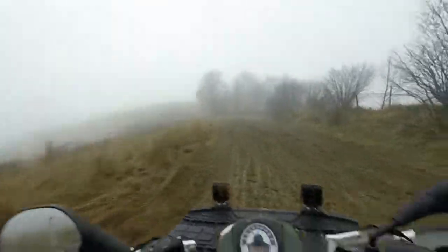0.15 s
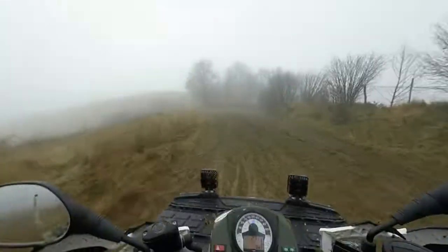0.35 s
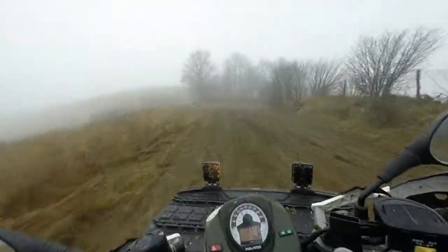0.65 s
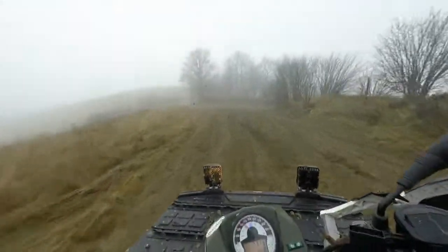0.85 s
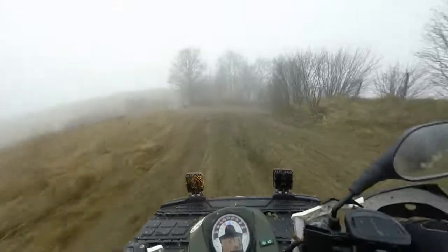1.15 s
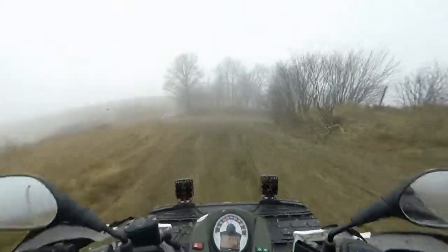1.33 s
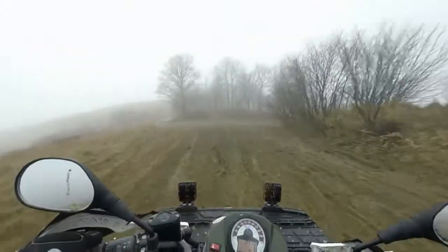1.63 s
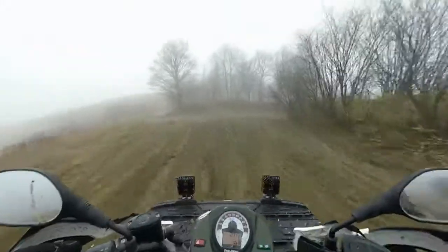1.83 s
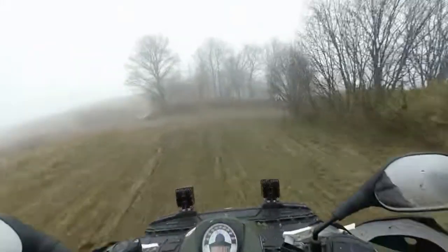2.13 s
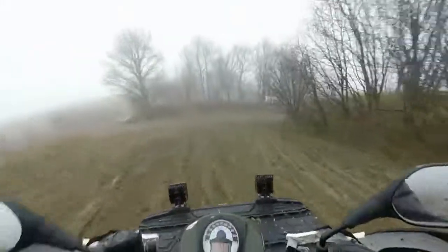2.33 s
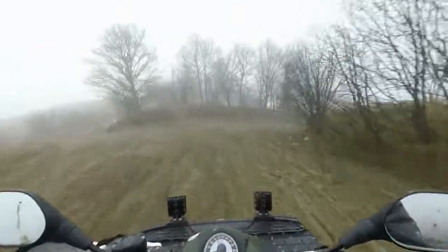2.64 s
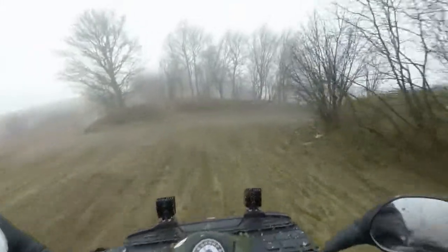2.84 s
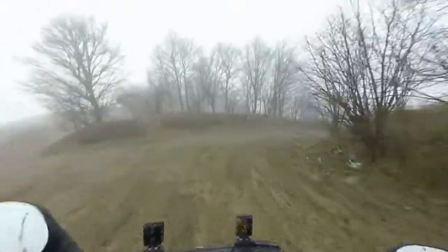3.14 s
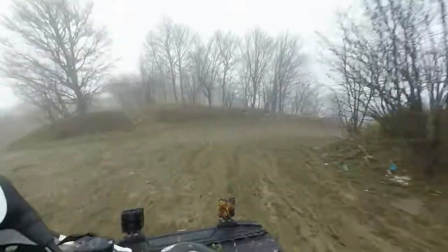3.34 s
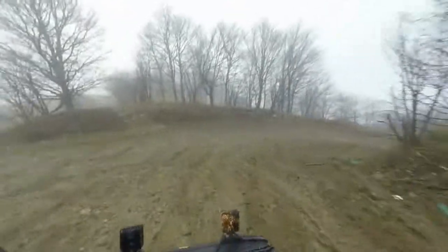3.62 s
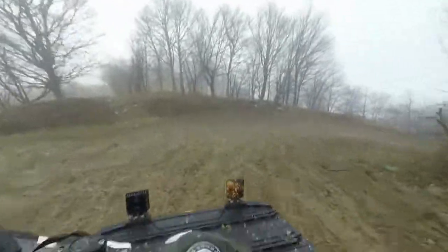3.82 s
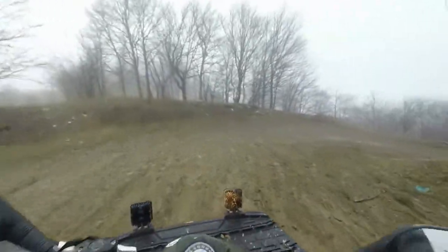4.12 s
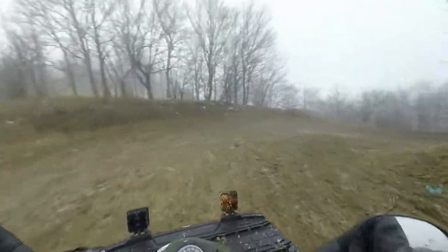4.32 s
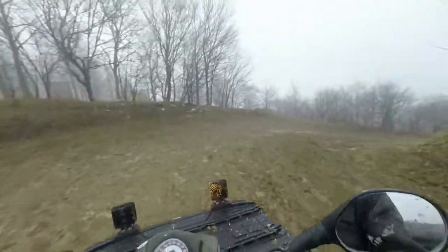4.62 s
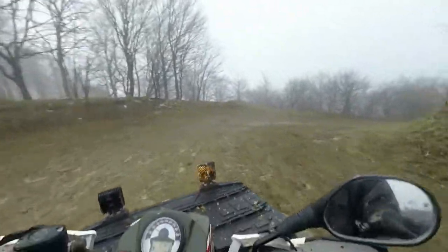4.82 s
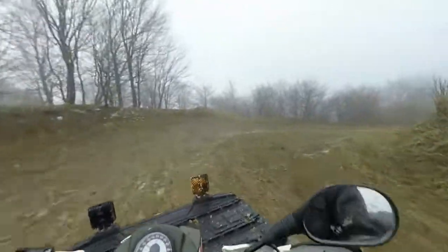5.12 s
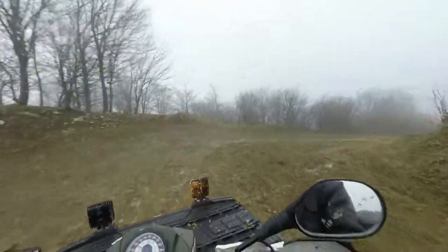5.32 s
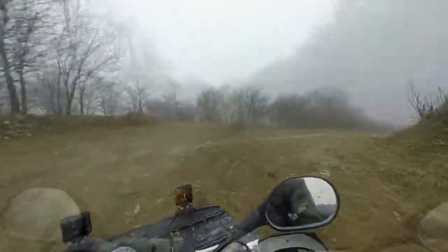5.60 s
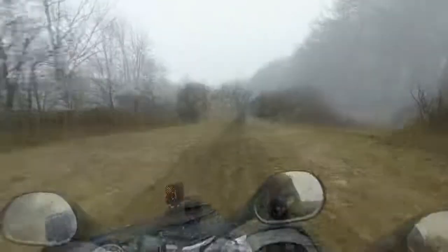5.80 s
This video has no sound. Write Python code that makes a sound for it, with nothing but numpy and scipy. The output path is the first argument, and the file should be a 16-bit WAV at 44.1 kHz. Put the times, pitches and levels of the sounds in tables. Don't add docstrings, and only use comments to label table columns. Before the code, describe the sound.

Heard from a microphone in a closed housing on the rider, a quad bike engine blares at full throttle for just over a second, raspy and clattering. It eases off, sinking to a low slow chug while ruts thump the frame, a brake squeaks briefly and loose plastic knocks. After four seconds the engine picks up again, much quieter than at first. Outdoors on a muddy track.

```python
import sys
import numpy as np
from scipy import signal
from scipy.fft import rfft, irfft
from scipy.io import wavfile

SR = 44100
rng = np.random.default_rng(int(sys.argv[2]) if len(sys.argv) > 2 else 0)


def materialize(psi):
    bounded = np.clip(np.atleast_2d(psi).T, -1, 1)
    quanta = np.round(bounded * 32767).astype(np.int16)
    wavfile.write(sys.argv[1], SR, quanta)


def rack_gain(trim_db):
    fader = np.asarray(trim_db, float)
    return 10 ** (fader / 20)


N = 262836

# [f/Hz, width/Hz, level/dB]
HOUSING = [(1440, 51, -2), (1696, 88, 5.5), (2050, 51, 2.5), (2390, 68, 3), (2501, 60, 7), (2615, 64, 4.5),
           (2740, 135, 6), (2667, 500, 5), (2900, 73, 5.5), (3200, 72, 1), (3740, 220, -0.5), (3730, 66, 7),
           (4313, 560, 11), (4955, 127, -12.5), (5597, 440, 8.5), (7020, 1160, 2.5), (8270, 370, -6),
           (9520, 1200, 5), (14300, 500, 2)]


def rms_one(x):
    return x / np.sqrt(np.mean(x ** 2) + 1e-20)


def in_time(rows):
    s, *columns = np.transpose(rows)
    return [np.interp(np.arange(N) / SR, s, column) for column in columns]


def at_hz(points, hz):
    points = np.array(points)
    return np.interp(np.log(hz), np.log(points[:, 0]), points[:, 1])


def drift(rate):
    step = 40
    r = np.exp(-2 * np.pi * rate * step / SR)
    slow = signal.lfilter([1], [1, -2 * r, r * r], rng.standard_normal(N // step + 2002))[2000:]
    return np.interp(np.arange(N) / step, np.arange(len(slow)), rms_one(slow))


def colour(x, spectrum, bumps=()):
    size = 2 ** 19
    hz = np.arange(1, size // 2 + 2) * SR / size
    db = at_hz(spectrum, hz)
    db = db - 30 * np.clip(np.log2(spectrum[0][0] / hz), 0, 3)
    db = db - 30 * np.clip(np.log2(hz / spectrum[-1][0]), 0, 3)
    for centre_hz, width, bump_db in bumps:
        db = db + bump_db / (1 + (2 * (hz - centre_hz) / width) ** 2)
    cepstrum = irfft(np.log(rack_gain(db)), size)
    cepstrum[1:size // 2] *= 2
    cepstrum[size // 2 + 1:] = 0
    return irfft(rfft(x, size) * np.exp(rfft(cepstrum)), size)[..., :N]


def ring(clicks, hz, t60):
    r, w = rack_gain(-60 / (t60 * SR)), 2 * np.pi * hz / SR
    return signal.lfilter([0, np.sin(w)], [1, -2 * r * np.cos(w), r * r], clicks + 1e-18)


def swell(start, end, db, rise, fall, floor_db):
    t = np.arange(0, N, 20)[:, None] / SR
    before, after = np.clip(start - t, 0, None), np.clip(t - end, 0, None)
    level = np.max(db - rise * before - fall * after, axis=1)
    return np.interp(np.arange(N) / SR, t[:, 0], np.maximum(level, floor_db))


def exhaust(cycle_hz, cycles, upper_db, roar_db, drone_db):
    # [multiple of the cycle, level at full speed/dB, level at low speed/dB]
    order_levels = [(5, -5, -10), (6, 0, -7), (7, -15, -2), (8, -10, -8), (9, -10, -7), (10, -13, -6),
                    (12, -12, -16), (11, -15, -10), (14, -16, -19), (16, -12, -22), (18, -19, -30),
                    (13, -15, -20), (15, -16, -21), (19, -15, -30), (20, -15, -30), (21, -16, -30),
                    (23, -16, -30)]
    # [f/Hz, level per Hz/dB]
    roar_spectrum = [(26, -25.5), (45, -0.5), (103, -6.5), (156, -10.5), (221, -7), (307, -16.5),
                     (400, -25.5), (520, -34.5), (880, -120)]
    # [f/Hz, level per Hz/dB]
    drone_spectrum = [(180, -22), (300, -5.5), (333, -9.5), (698, -11), (784, -11.5), (875, -15.5),
                      (963, -11.5), (1300, -14.5), (1400, -6.5), (1820, -20.5), (3080, -120)]
    # [f/Hz, width/Hz, level/dB]
    panel_bumps = [(190, 240, 0.5), (476, 41, 5), (688, 12, -4)]
    low_speed_hz, full_speed_hz = 40, 48
    fast = np.clip((cycle_hz - low_speed_hz) / (full_speed_hz - low_speed_hz), 0, 1)

    def order(k, db):
        level = rack_gain(db + (2 - fast) * drift(12))
        turns = k * cycles + .25 * rng.random() + (.045 - .03 * fast) * drift(8)
        return level * np.sqrt(2) * np.sin(2 * np.pi * turns)

    tones = sum(order(k, boom(k)) for k in (2, 3, 4))
    for k, full_db, slow_db in order_levels:
        usual_db = upper_db + fast * full_db + (1 - fast) * slow_db
        tones = tones + order(k, np.maximum(boom(k), usual_db))
    puff = (1 + 0.053 * np.cos(2 * np.pi * cycles)) * rack_gain(1.2 * drift(6.5))
    roar = rms_one(colour(puff * rng.standard_normal(N), roar_spectrum, panel_bumps))
    drone = rms_one(colour(puff * rng.standard_normal(N), drone_spectrum, panel_bumps))
    turn_loss_db = 2.5 * np.clip((np.arange(N) / SR - 3.3) / 1.3, 0, 1)
    return tones + rack_gain(roar_db - 3.0 - turn_loss_db) * roar + rack_gain(drone_db - 1.47) * drone


def boom(k):
    SECOND, THIRD, FOURTH, FIFTH, SIXTH, SEVENTH, EIGHTH, NINTH, TENTH, ELEVENTH = range(2, 12)
    # [start t/s, end t/s, multiple of the cycle, level/dB]
    pipe_booms = [(0, 1.29, SECOND, -33.5), (1.1, 1.32, SIXTH, -38), (.8, 1.28, THIRD, -44),
                  (.38, 1.25, FOURTH, -40), (0, .3, FIFTH, -42), (.05, .3, FOURTH, -43),
                  (2.3, 2.5, THIRD, -40), (.75, 1.28, FIFTH, -40), (1.36, 1.62, THIRD, -35),
                  (1.62, 1.97, THIRD, -34), (1.32, 1.5, FOURTH, -44), (1.95, 2.2, SECOND, -42),
                  (2.0, 2.25, THIRD, -43), (2.1, 2.27, SEVENTH, -43), (2.02, 2.5, TENTH, -49),
                  (2.56, 3.04, FOURTH, -38), (2.38, 2.56, FOURTH, -43), (1.8, 1.95, NINTH, -46),
                  (2.72, 2.95, NINTH, -46), (2.55, 2.9, ELEVENTH, -51), (2.3, 2.6, EIGHTH, -48),
                  (1.85, 2.15, FIFTH, -44), (4.28, 4.45, NINTH, -47), (3.02, 3.35, FIFTH, -43),
                  (3.55, 4.1, SIXTH, -51), (4.26, 4.42, FIFTH, -46), (4.45, 4.58, SEVENTH, -45),
                  (4.6, 4.87, THIRD, -42), (4.6, 4.86, FOURTH, -43), (4.3, 4.85, EIGHTH, -48),
                  (5.02, 5.38, SEVENTH, -43.5), (4.4, 4.62, TENTH, -50), (5.1, 5.5, ELEVENTH, -55),
                  (4.9, 5.35, TENTH, -50), (5.3, 5.45, SECOND, -45), (5.05, 5.35, THIRD, -46),
                  (5.47, 5.75, FOURTH, -45), (5.5, 5.62, EIGHTH, -45), (5.6, 5.8, THIRD, -48)]
    floor_db, fade = -58, 220
    rows = [(start, end, db) for start, end, order, db in pipe_booms if order == k]
    start, end, db = np.transpose(rows + [(0, 0, floor_db)])
    return swell(start, end, db, fade, fade, floor_db - 10 * (k > 4))


def clatter(cycles, repeat_share, level_db, bright_db, lower_db):
    # [f/Hz, level per Hz/dB]
    clatter_spectrum = [(900, -27), (1300, -23), (2000, -9), (3000, -17), (4000, -24.5), (6000, -26),
                        (8000, -35.5), (11000, -42.5), (15000, -49)]
    # [f/Hz, width/Hz, share added]
    turned_bumps = [(2010, 150, 0.28), (2480, 220, 0.23), (2840, 300, -0.21), (4150, 320, 0.35),
                    (1700, 360, -0.16), (5000, 240, 0.22)]
    count = 320
    slot = np.floor(cycles * count).astype(int)
    pattern = rng.standard_normal(count) * rack_gain(3.5 * rng.standard_normal(count))
    pattern = 0.79 * np.roll(pattern, count // 2) + pattern
    pattern = pattern - pattern.mean()
    repeated = rms_one(np.diff(slot, prepend=slot[0]) * pattern[slot % count])
    loose = rms_one(rng.standard_normal(N) * rack_gain(0.24 * drift(460.0)))
    hits = np.sqrt(repeat_share) * repeated + np.sqrt(1 - repeat_share) * loose
    hits *= rack_gain(0.43 * drift(15.0))
    crank = np.cos(2 * np.pi * cycles)
    hits *= 1 + .5 * crank ** 12 + .08 * crank

    turn_s, turn_takes_s, cover_gain_db, case_loss_db = 4.17, 0.31, 2, 1
    turned = np.clip((np.arange(N) / SR - turn_s) / turn_takes_s, 0, 1)
    rest = rms_one(colour(hits, clatter_spectrum, HOUSING))
    added = sum(share * signal.lfilter(*signal.iirpeak(hz, hz / width, SR), rest)
                for hz, width, share in turned_bumps)
    rest = rest + turned * added

    out = 0
    for edge_hz in (1550, 2250, 3450, 4950, 6500, 8300, 11500, 20000):
        band = signal.sosfiltfilt(signal.butter(2, edge_hz, fs=SR, output="sos"), rest)
        rest = rest - band
        balance_db = bright_db * (edge_hz > 4000)
        balance_db = balance_db + (lower_db + 4.5 - case_loss_db * turned) * (edge_hz < 3000)
        balance_db = balance_db + cover_gain_db * turned * (edge_hz == 4950)
        out = out + band * rack_gain(balance_db + .4 * drift(4) + 1.0 * drift(14) + 1.1 * drift(80))
    return rack_gain(level_db) * out


def flares():
    # [t/s, peak level/dB]
    snaps = [(0.0458, -6), (0.0872, -5), (0.139, -11), (0.2389, -12), (0.2713, -17), (0.4224, -22),
             (0.7236, -8), (0.8046, -21), (0.9448, -20), (1.0251, -10), (1.1024, -6), (1.224, -17),
             (1.245, -3.5), (1.8297, -24), (1.8956, -30), (1.9814, -19), (2.0118, -21), (2.0901, -23),
             (2.143, -22), (2.1799, -16), (2.2373, -22), (2.5765, -29), (2.6748, -25), (3.0859, -26),
             (3.2789, -25), (4.4076, -18), (4.4523, -25), (4.4822, -20), (4.8379, -23), (4.8728, -27),
             (4.917, -18), (5.0045, -33), (5.0355, -28), (5.0988, -17.5), (5.2225, -32), (5.4575, -28)]
    # [f/Hz, level per Hz/dB]
    flare_spectrum = [(1900, -2.5), (2500, 1), (3300, -8), (4300, -15), (6000, -26)]
    s, peak_db = np.transpose(snaps)
    kicks = np.zeros(N)
    kicks[(s * SR).astype(int)] = rack_gain(peak_db - 13)
    r = np.exp(-1 / (0.0083 * SR))
    noise = rms_one(colour(rng.standard_normal(N), flare_spectrum, HOUSING))
    soft_kicks = signal.lfilter([.02], [1, -.98], kicks + 1e-18)
    return noise * signal.lfilter([1], [1, -r], soft_kicks)


def whine():
    # [middle t/s, length/s, f/Hz, level/dB]
    gear_tones = [(.5, .4, 1870, -37), (1.05, .3, 1680, -41), (.5, .2, 1390, -44), (1.82, .07, 1385, -38),
                  (1.93, .05, 1390, -41), (2.11, .05, 1385, -41), (1.55, .1, 1400, -44),
                  (1.0, .25, 2750, -31), (.62, .2, 2745, -33), (.9, .18, 2955, -35), (.75, .12, 2855, -33),
                  (1.27, .06, 2600, -30), (1.24, .08, 2500, -33), (1.85, .35, 2020, -44),
                  (2.33, .1, 2030, -37), (2.62, .08, 1600, -43), (2.5, 1.1, 155, -44), (2.1, .25, 193, -37),
                  (1.56, .25, 200, -34), (3.6, .025, 522, -43)]
    t, out = np.arange(N) / SR, np.zeros(N)
    for s, length, hz, db in gear_tones:
        level = rack_gain(db - 24 * ((t - s) / length) ** 4) * (.7 + .35 * drift(25))
        out += level * np.sin(2 * np.pi * np.cumsum(hz * (1 + .006 * drift(25))) / SR)
    return out


def ruts():
    # [t/s, bounce level/dB, heave level/dB]
    rut_hits = [(0.0, -23, -31), (.12, -41, -36), (.3, -48, -35), (.62, -38, -40), (.74, -34, -55.5),
                (.95, -39, -36), (1.16, -43, -52), (1.34, -30, -30), (1.5, -26, -44), (1.64, -34, -37.5),
                (1.86, -21.5, -38), (2.04, -22, -36), (2.18, -26, -41), (2.44, -18, -29),
                (2.62, -21.5, -32), (3.02, -21, -28.5), (3.25, -22.5, -29.5), (3.42, -22.5, -28.5),
                (3.68, -22.5, -41), (3.93, -22.5, -42), (4.1, -43, -37.5), (4.33, -29.5, -36),
                (4.58, -31, -35), (4.9, -40, -36), (5.02, -43, -33), (5.18, -31, -40), (5.31, -39, -50),
                (5.6, -33, -47), (5.71, -44, -50), (5.84, -49, -48)]
    s, bounce, lift = np.transpose(rut_hits)
    bounce_db = swell(s, s, bounce, rise=250.5, fall=167, floor_db=-42.5)
    late = s + 0.02
    heave_db = swell(late, late, lift, rise=200, fall=131, floor_db=-49.5)
    wave = np.sin(2 * np.pi * np.cumsum(38 * (1 + .07 * drift(5))) / SR)
    lumps = rms_one(colour(rng.standard_normal(N), [(20, -1), (34, 0), (44, -10)]))
    heave = np.sin(2 * np.pi * np.cumsum(15.0 * (1 + 0.206 * drift(2.8))) / SR)
    return rack_gain(bounce_db) * (0.82 * wave + 0.19 * lumps) + 1.8 * rack_gain(heave_db) * heave


def knocks():
    # [t/s, peak level/dB, bright share/dB, deep share/dB, rim share/dB]
    blow_times = [(2.224, -44, -4, -8, -3), (2.976, -29, -10, -18, -2), (2.991, -35, -6, -2, 0),
                  (3.001, -30.5, -6, -6, 0), (3.014, -35, -14, -9, 2), (3.026, -33.5, -4, 5.5, 0),
                  (3.595, -45, 8, 0, 0), (3.8925, -34.5, -22, 0.5, 7.5), (4.578, -32, -13, -23, 2.5),
                  (4.729, -31, -22, -10, 4), (5.027, -33.5, -8, -9, -4), (5.346, -35.5, -23, -7, 2),
                  (5.432, -40, -15, -8, 0), (5.498, -43, -8, -10, 4), (5.594, -30.5, -27.5, -8, 3),
                  (5.613, -34, 5.5, -17, -1), (5.821, -46, 9.5, -12, -2), (5.886, -47, -14, -14, 11)]
    # [f/Hz, level/dB, t60/s]
    body_modes = [(729, -7.5, 0.08), (770, 3, 0.03)]
    # [f/Hz, level/dB, t60/s]
    rim_modes = [(1006, -7, 0.017), (1210, -10, 0.02), (1440, -3.5, 0.015)]
    # [f/Hz, level/dB, t60/s]
    deep_modes = [(223, 0, 0.1), (317, 7.5, 0.04), (497, -3, 0.026)]
    # [f/Hz, level/dB, t60/s]
    bright_modes = [(1530, -14.5, 0.032), (2110, -10, 0.013), (2420, -5.5, 0.017), (2960, -13.5, 0.032)]
    rebound_s, rebound_db = 0.0013, -2.5
    s, peak_db, bright_db, deep_db, rim_db = np.transpose(blow_times)
    out = np.zeros(N)
    for modes, share_db, contact_hz in (
            (body_modes, -2.5, 1500), (rim_modes, rim_db + 0.5, 1700),
            (deep_modes, deep_db - 2.0, 800), (bright_modes, bright_db + 10.5, 3600)):
        blows = np.zeros(N)
        blows[(s * SR).astype(int)] = rack_gain(peak_db + share_db)
        if contact_hz < 1600:
            blows[((s + rebound_s) * SR).astype(int)] = rack_gain(peak_db + share_db + rebound_db)
        else:
            blows = np.roll(blows, int(rebound_s * SR))
        blows = signal.sosfilt(signal.butter(2, contact_hz, fs=SR, output="sos"), blows)
        out += sum(rack_gain(db) * ring(blows, hz, t60) for hz, db, t60 in modes)
    return out


def jolts():
    # [t/s, peak level/dB, length/s]
    jolt_times = [(2.367, -35, 0.0065), (2.946, -42, 0.0057), (3.176, -48, 0.0037), (3.2185, -37, 0.0093),
                  (3.323, -37, 0.0042), (3.5994, -45, 0.0055), (4.217, -52, 0.004), (4.25, -41, 0.0046),
                  (4.316, -59, 0.0044), (4.58, -41, 0.0043), (5.539, -32.5, 0.0024), (5.772, -36, 0.0022),
                  (5.894, -55, 0.0034)]
    spectrum = [(1700, 15), (2500, 9.5), (4000, 1.5), (6000, 5.0), (9000, -11), (14000, -44)]
    out, n = np.zeros(N), np.arange(1500)
    for s, peak_db, length in jolt_times:
        rattle = rng.standard_normal(1500) * np.minimum(n / 60, 1) * np.exp(-n / (length * SR))
        out[int(s * SR):int(s * SR) + 1500] += rack_gain(peak_db) * rattle
    return colour(out, spectrum, HOUSING)


def grit():
    # [t/s, peak level/dB, centre f/Hz]
    grains = [(0.4144, -37, 8930), (0.927, -18, 8300), (1.575, -35, 8650), (1.936, -26, 8900),
              (2.0243, -39, 8830), (2.6898, -45, 9600), (2.7085, -39, 8820), (2.8215, -46, 9690),
              (2.9078, -54, 9700), (3.2764, -55, 9430), (3.314, -47, 9590), (3.3378, -47, 9050),
              (3.4989, -57, 9130), (3.6536, -52, 10100), (3.675, -48, 8910), (3.7748, -49, 9380),
              (3.7963, -47, 8890), (3.8132, -49, 9460), (3.8234, -57, 8830), (4.3834, -58, 9510),
              (4.8234, -58, 9010), (4.9094, -58, 10500), (4.9434, -50, 8900), (5.2204, -52, 9120),
              (5.26, -37, 8900), (5.2714, -40, 8800), (5.3163, -44, 10000), (5.3264, -51, 9770),
              (5.4714, -57, 9100), (5.4884, -44, 8890)]
    out, fall = np.zeros(N), np.exp(-np.arange(400) / (0.0008 * SR))
    for s, peak_db, hz in grains:
        band = signal.butter(3, [hz / 1.25, hz * 1.25], "band", fs=SR, output="sos")
        burst = signal.sosfilt(band, rng.standard_normal(400) * fall)
        out[int(s * SR):int(s * SR) + 400] += rack_gain(peak_db) * burst / np.abs(burst).max()
    return out


def brake():
    # [start t/s, end t/s, level/dB]
    slips = [
        (2.72, 2.72, -36),
        (2.735, 2.72, -26),
        (2.74, 2.747, -27.5),
        (2.754, 2.753, -28),
        (2.766, 2.764, -36),
        (2.772, 2.782, -40),
        (2.784, 2.788, -25.5),
        (2.808, 2.809, -41),
        (2.815, 2.824, -48),
    ]
    s, end, slip_db = np.transpose(slips)
    t = np.arange(N) / SR
    db = swell(s, end, slip_db, rise=2300, fall=3300, floor_db=-120)
    hz = 5520 + 540 * np.clip(t - s[0], 0, s[-1] - s[0])
    phase = 2 * np.pi * np.cumsum(hz * (1 + .011 * drift(150))) / SR
    tone = rack_gain(db + 1.5 * drift(90)) * np.sin(phase)
    octave_on = (t > 2.734) & (t < 2.797)
    octave = rack_gain(db / 2 - 41 + 4 * drift(200)) * octave_on * np.sin(2 * phase)
    return tone + octave


def scene():
    # [t/s, firing cycles f/Hz]
    speed_curve = [(0, 49.7), (.62, 49.2), (.9, 50.7), (1.3, 50.6), (1.37, 46), (1.57, 38), (1.8, 33),
                   (1.98, 30.9), (2.26, 35), (3.05, 21.6), (3.5, 17.2), (4.1, 16.5), (4.57, 32.4),
                   (4.85, 28.6), (5.02, 31.8), (5.4, 32.9), (5.53, 29.7), (5.96, 28)]
    # [t/s, load level/dB, throttle 0-1]
    load_curve = [(0, -26, 0.76), (.4, -25.5, 0.95), (1.22, -25, 0.96), (1.38, -28.5, 0.63),
                  (1.62, -31.5, 0), (1.96, -32.5, 0), (2.21, -33, 0.8), (2.62, -34.5, 0), (3.0, -40, 0.14),
                  (3.8, -42, 0), (4.1, -45.5, 0.55), (4.25, -43.5, 0.05), (4.55, -35, 0.57),
                  (4.78, -40.5, 0.53), (5.0, -39, 0.98), (5.3, -36.5, 0.28), (5.58, -41, 0.46),
                  (5.96, -42.5, 0.82)]
    cycle_hz, = in_time(speed_curve)
    load_db, throttle = in_time(load_curve)

    def follow(middle_db, per_load_db, full_throttle_db, per_octave_db):
        effort_db = per_load_db * (load_db + 35) + full_throttle_db * np.clip(throttle, 0, 1.2)
        return middle_db + effort_db + per_octave_db * np.log2(cycle_hz / 30)

    clatter_db = follow(-42, 1.1163, 12, 0.36)
    bright_db = follow(-35, 1.027, 0.5, -1.04)
    lower_db = follow(-39.5, 1.08, -1.15, -2.1)
    roar_db = follow(-33.5, 0.41, -4, 3.5)
    drone_db = follow(-43.5, 0.67, 0.5, 1.5)
    upper_db = follow(-54.5, 0.67, 11.5, -1.5)
    cycles = np.cumsum(cycle_hz * (1 + .002 * drift(8.0))) / SR
    engine = exhaust(cycle_hz, cycles, upper_db, roar_db, drone_db)
    engine = engine + clatter(cycles, 0.15, clatter_db, bright_db - clatter_db, lower_db - clatter_db)
    engine = engine + flares() + whine()
    return (engine + ruts() + knocks() + jolts() + grit() + brake())[None]


def top_cut(x):
    return signal.sosfilt(signal.butter(12, 15690, fs=SR, output="sos"), x)


def record(dry):
    dull = signal.sosfilt(signal.cheby2(8, 16, 15150, fs=SR, output="sos"), dry)
    return top_cut(dull)


dry = scene()
out = record(dry)
materialize(out)
```